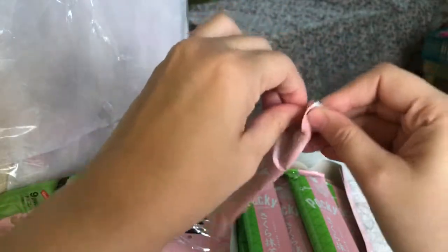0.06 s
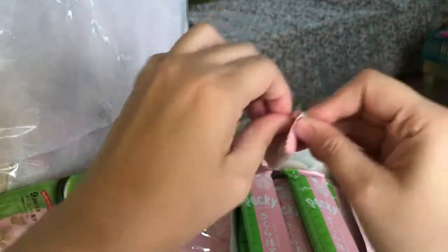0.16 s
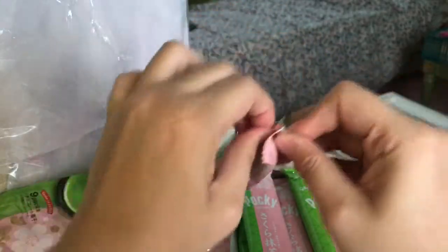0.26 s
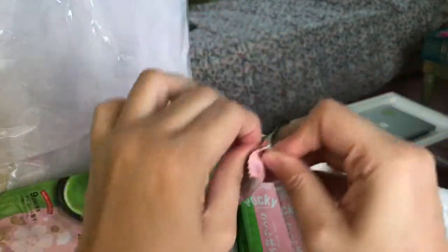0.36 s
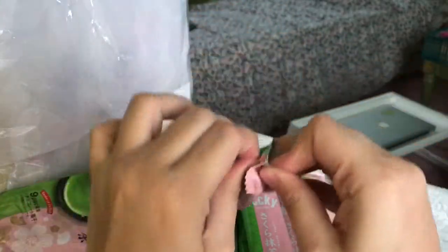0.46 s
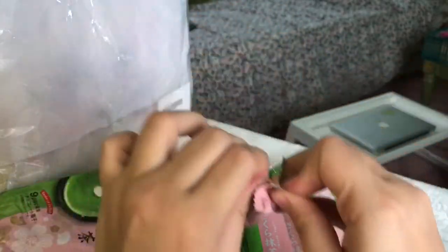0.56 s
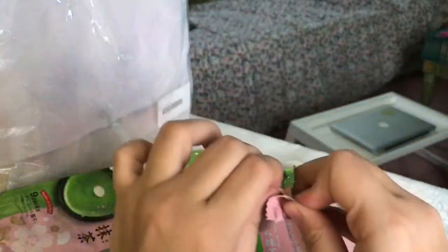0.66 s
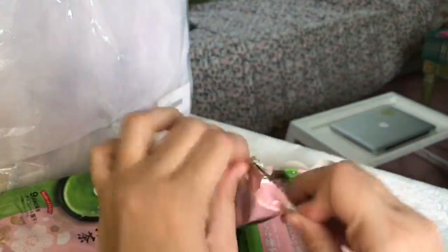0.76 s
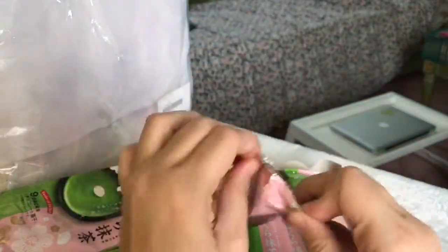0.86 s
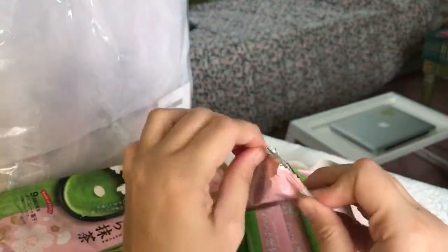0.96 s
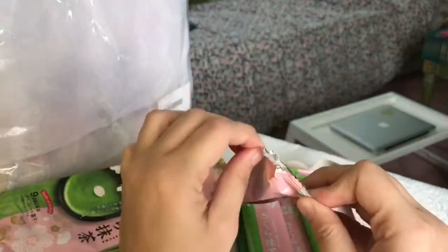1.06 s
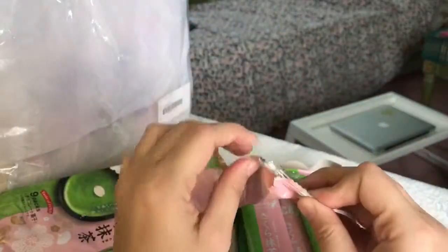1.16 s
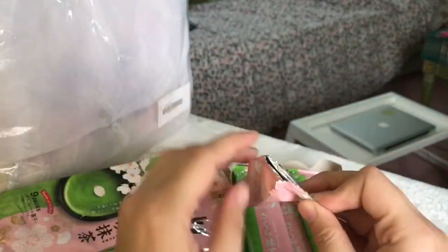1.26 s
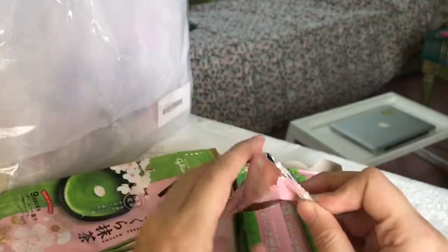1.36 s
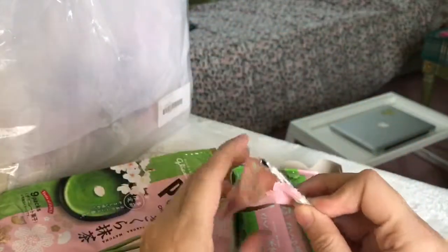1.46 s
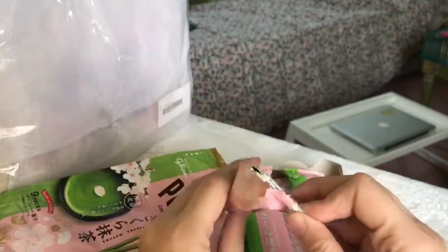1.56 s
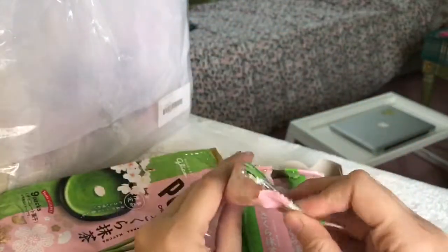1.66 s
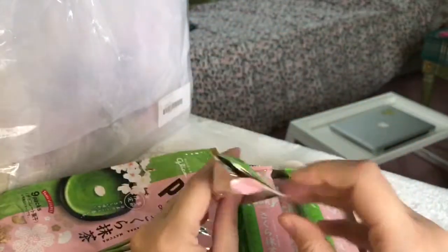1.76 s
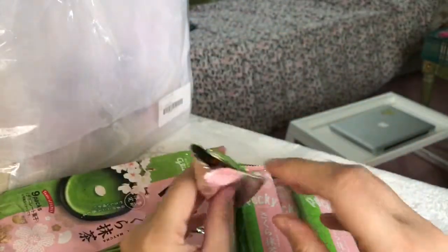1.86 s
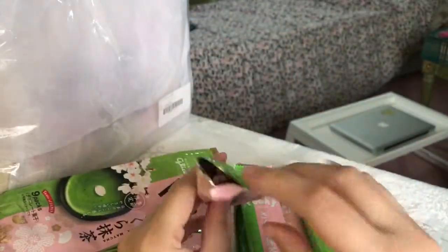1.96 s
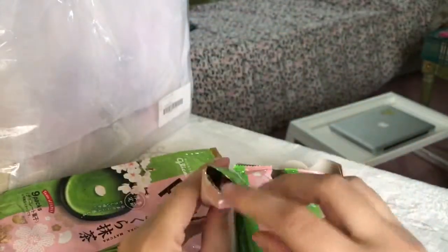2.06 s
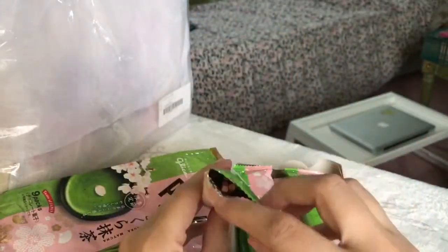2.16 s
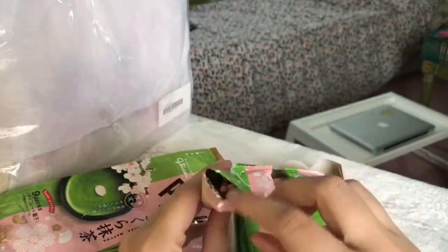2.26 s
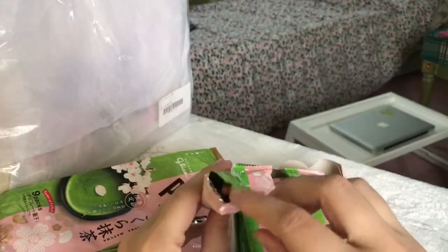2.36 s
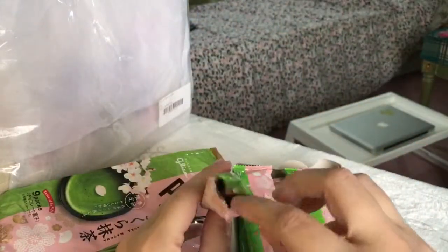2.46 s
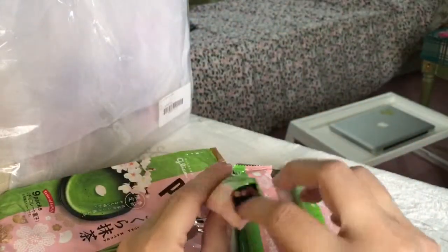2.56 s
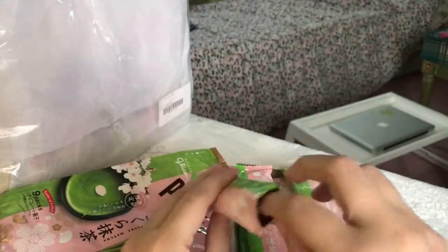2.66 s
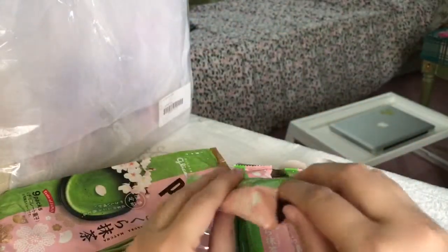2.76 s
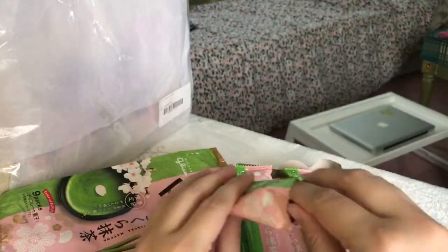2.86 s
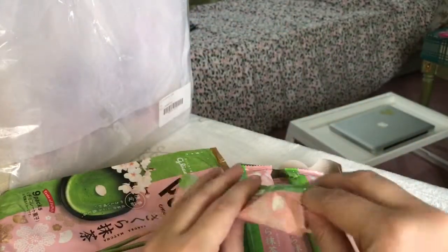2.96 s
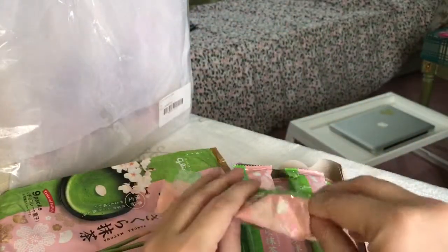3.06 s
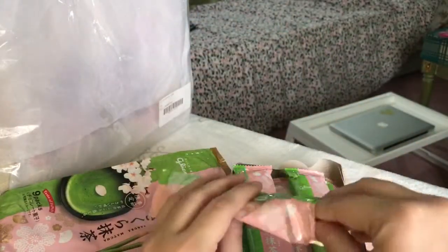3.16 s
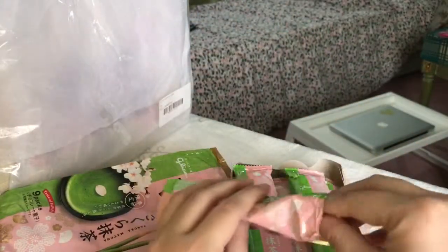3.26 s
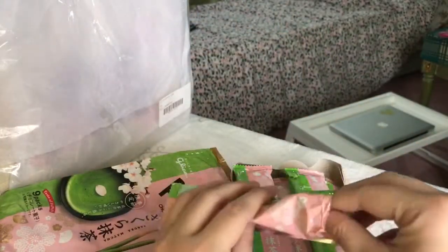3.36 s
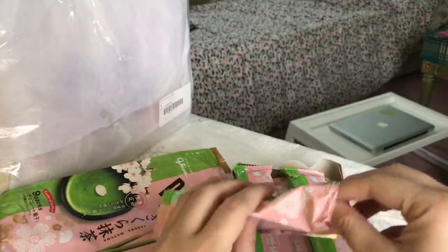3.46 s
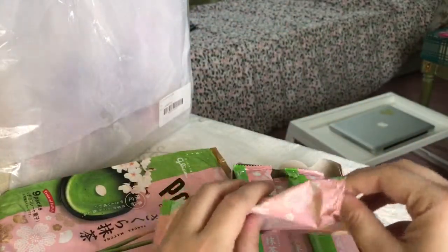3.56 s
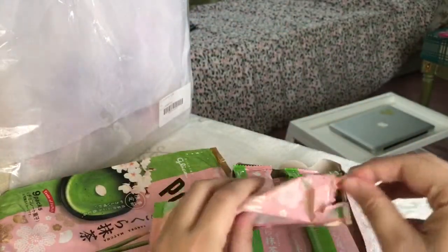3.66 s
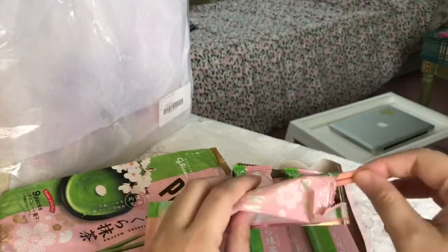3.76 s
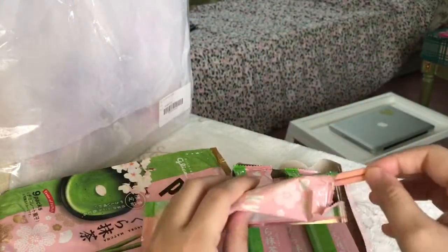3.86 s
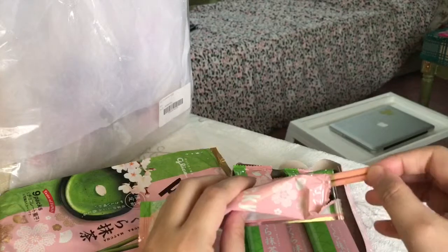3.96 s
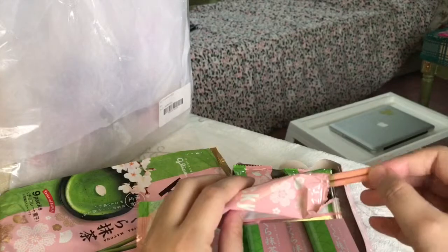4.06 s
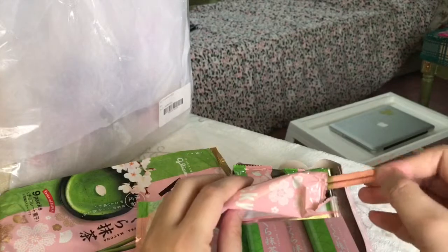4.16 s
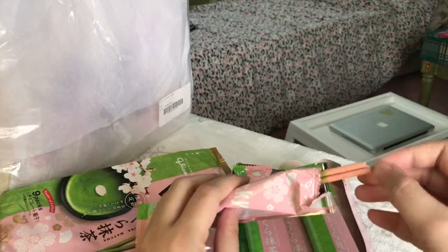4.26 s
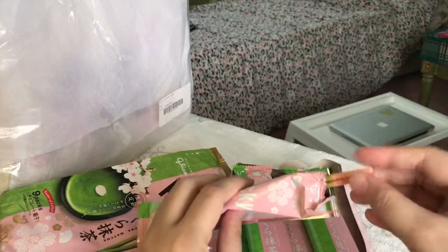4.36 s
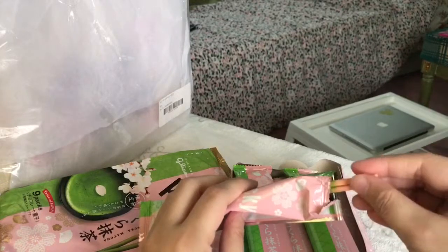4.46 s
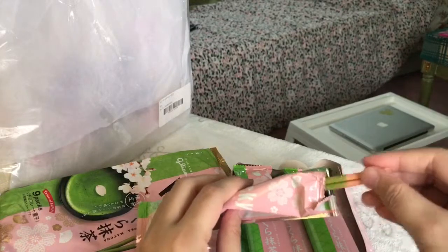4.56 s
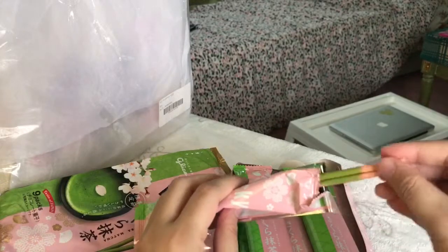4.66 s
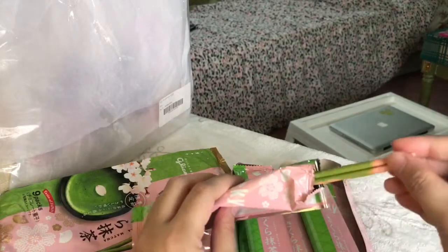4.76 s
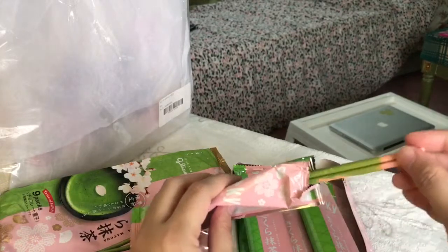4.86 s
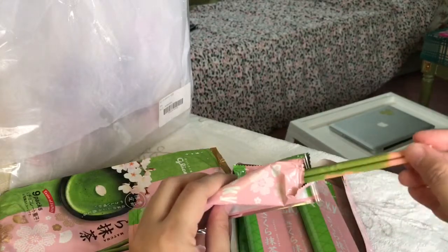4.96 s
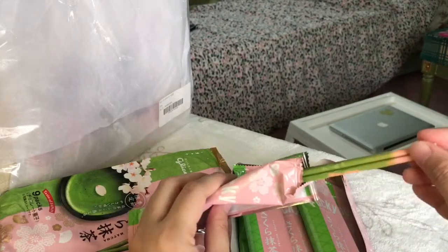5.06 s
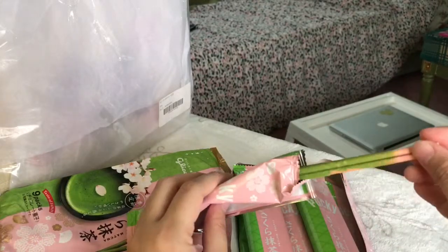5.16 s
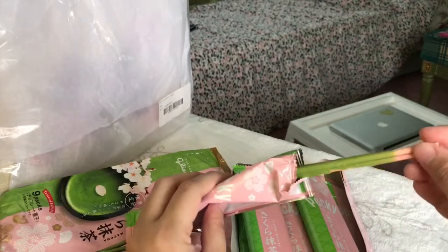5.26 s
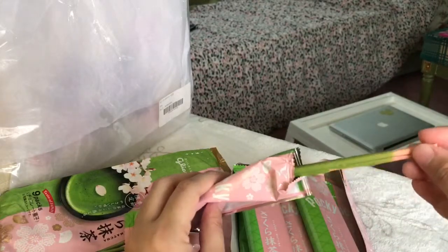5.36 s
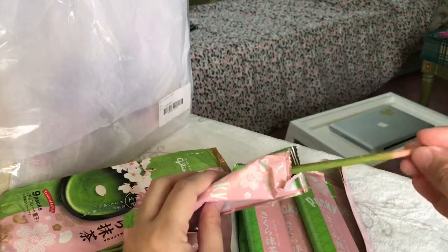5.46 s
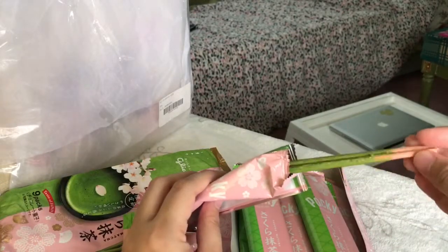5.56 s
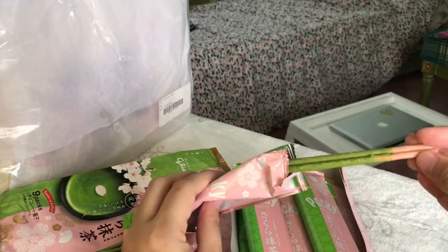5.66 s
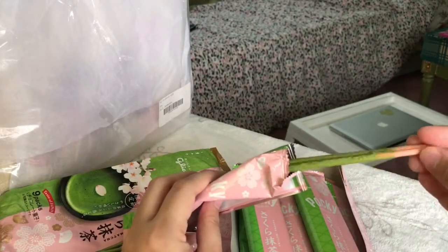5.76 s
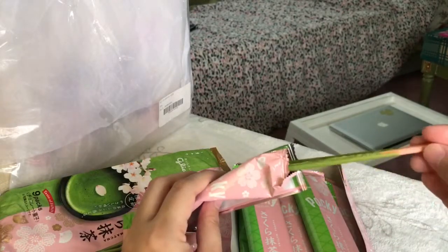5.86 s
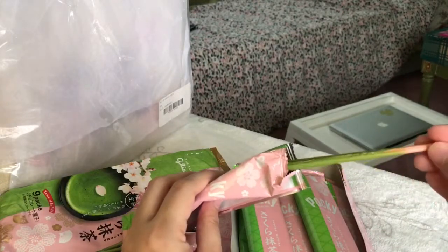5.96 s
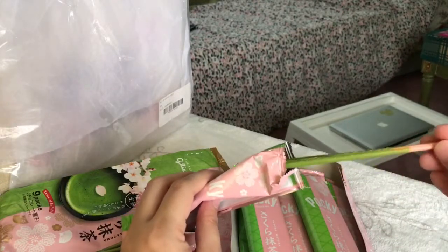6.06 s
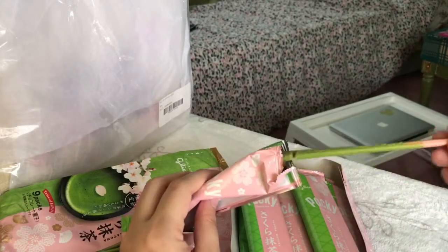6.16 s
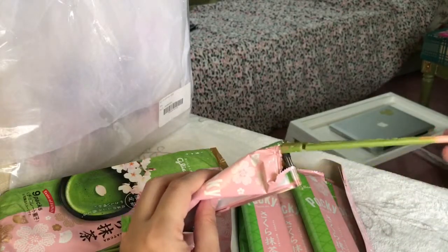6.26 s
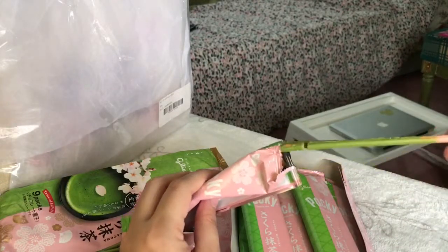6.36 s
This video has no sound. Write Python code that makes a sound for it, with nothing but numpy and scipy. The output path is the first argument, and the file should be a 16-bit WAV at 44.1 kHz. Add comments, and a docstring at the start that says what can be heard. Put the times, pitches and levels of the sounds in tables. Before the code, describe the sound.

Close to a phone microphone in a small furnished room, fingers pinch and tear a foil snack packet with bright snaps and a short harsh rip. Crinkling continues as the opening is spread and squeezed, then thins to soft slides and small ticks as biscuit sticks are drawn out. A low appliance hum runs throughout.

```python
"""A small furnished room, phone microphone close to a foil snack packet, an appliance motor humming throughout.
The seal tears in tiny jerks; creases snap as decaying noise flicks that ring at the pitch of their facets.
Fingers rustle the film as swelling crackle and hiss; rubbed panels sing as narrow noise at a sliding pitch.
Biscuit sticks slide out as softer rustle and tick as short decaying tones.
The room answers with a smeared near echo and a fading noise wash."""
import sys
import numpy as np
from scipy import signal
from scipy.fft import rfft, irfft, next_fast_len
from scipy.io import wavfile

SR = 44100
rng = np.random.default_rng(int(sys.argv[2]) if len(sys.argv) > 2 else 0)


def master_out(mix):
    """Clip the mix to full scale and print it as 16-bit PCM to the path in sys.argv[1]."""
    frames = np.transpose(np.atleast_2d(mix))
    ceiling = np.clip(frames, -1, 1)
    pcm = np.round(ceiling * 32767).astype(np.int16)
    wavfile.write(sys.argv[1], SR, pcm)


N = 283320
TIME = np.arange(N) / SR

# Motor hum: shaft_multiple, level_db (rms)
MOTOR_HARMONICS = [(1, -59), (5, -57), (6, -41.5), (7, -75), (8, -68.5), (13, -72.5)]
# Steady tones beside the motor hum: pitch_hz, level_db (rms)
STEADY_TONES = [(47.12, -61.5), (141.4, -69), (293.8, -61)]
# Spectrum of the appliance's air rush: frequency_hz, relative_level_db
AIR_SPECTRUM = [(20, -44), (36, -8), (46, -1.5), (66, -2), (108, -11.5), (140, 4.5), (160, -1), (183, -5.5),
                (255, -3), (295, -0.5), (325, -9), (650, -18), (2800, -33), (16000, -49.5)]
# Faint singing of the appliance casing: pitch_hz, width_hz, level_db (rms)
CASING_TONES = [(1670, 40, -91), (2577, 47, -77)]
MOTOR_HZ, IN_STEP_S = 48.41, .22  # shaft rate; moment when all the hum's tones are in step
AIR_DB = -51  # rms

# Ranges in which the film radiates, bass to top: low_hz, high_hz
FILM_RANGES = [(450, 2000), (2000, 7000), (7000, 11000), (11000, 16500)]
# Colour of the film within those ranges: frequency_hz, gain_db
FILM_COLOUR = [(400, -2.5), (900, 1.5), (2000, 0), (3500, 2.5), (5200, 2.5), (7400, -2), (9000, 2.5),
               (10400, -1.5), (12000, 7), (15500, 6)]
# Uneven colour of the film rubbed by biscuit sticks: frequency_hz, gain_db
BISCUIT_COLOUR = [(700, 0), (1500, -5.5), (2400, -0.5), (4200, -3), (6200, 2), (8000, -8), (10000, 5),
                  (12000, 1.5), (15500, 2)]

# In the film tables below, level_db is the direct level at 2-7 kHz, rms over length_s (SNAP_S for snaps);
# bass_db and treble_db tilt the ranges below and above it.
# Biscuit sticks knocking together: start_s, peak_level_db
STICK_KNOCKS = [(4.7206, -25), (5.4184, -33.5)]
# Taut film rubbed by skin or a stick: start_s, length_s, first_hz, last_hz, width_hz, level_db (rms)
PANEL_SCRAPES = [ (2.275, .115, 3170, 2720, 30, -66), (2.301, 0.011, 5860, 5900, 900, -60),
                 (2.324, 0.044, 5080, 4690, 896, -60.5), (4.14, 0.094, 4920, 5160, 1150, -68),
                 (4.764, 0.14, 1434, 1440, 151.2, -69), (5.125, 0.091, 2450, 2510, 700, -68),
                 (5.662, 0.096, 7600, 7200, 700, -78), (5.672, 0.13, 3950, 3650, 700, -71.5)]
# Sticks sliding inside the packet: start_s, length_s, level_db (before biscuit colour), treble_db
STICK_SLIDES = [(4.15, 0.1, -66.5, -8.5), (4.465, 0.11, -71.5, -5.5), (4.565, 0.14, -60.5, -3.5),
                (4.97, 0.13, -64.5, -6.5), (5.14, 0.028, -64.5, -8.5), (5.23, 0.11, -72.5, -7.5),
                (5.45, .19, -65.5, -6), (5.68, 0.348, -75.5, -4.5), (6.04, 0.15, -66, -6),
                (6.29, .07, -71, -4.5)]
# Fingers pinching, spreading or squeezing the film: start_s, length_s, level_db, treble_db
FINGER_GRIPS = [(0, 0.055, -45, 0), (0.165, .05, -56, 2), (0.366, 0.038, -55.5, 9),
                (0.489, 0.068, -62, 3.5), (0.559, 0.054, -45, 6), (0.64, .045, -51.5, 5.5),
                (0.785, .02, -45, 8), (0.803, 0.041, -35.5, -3), (0.858, 0.12, -55, -5.5),
                (1.0, .46, -65, -4.5), (1.166, 0.12, -66, -6), (1.629, 0.047, -55.5, -3.5),
                (1.682, 0.18, -58.5, -6), (1.856, 0.42, -66.5, -4.5), (2.327, 0.052, -56.5, -3),
                (2.551, 0.46, -61, -6), (2.694, 0.018, -57.5, 4), (2.932, 0.041, -48, -0.5),
                (2.978, 0.048, -43, -4.5), (3.044, 0.076, -53, -6), (3.117, 0.082, -48, -4.5),
                (3.184, 0.078, -54.5, -1), (3.349, 0.023, -51, -10.5), (3.39, 0.16, -59, -4.5),
                (3.522, 0.079, -52, -9.5), (3.635, 0.07, -45.5, -3.5), (3.801, 0.34, -67, -1.5)]
# Fingertip dragged over the ribs of the seal: start_s, length_s, level_db, bass_db, treble_db, unevenness (0-1)
SEAL_RIBS = [(3.2255, 0.025, -64, -14, 13, 0.1)]
# Film tearing, and a few single sharp clicks of film:
# start_s, length_s, level_db, bass_db, treble_db, unevenness (0-1)
FILM_RIPS_AND_CLICKS = [(0.085, 0.02, -44.5, -27, 5, 0.67), (0.1168, 0.021, -41.5, -22, 10, 0.9),
                        (0.1675, 0.036, -56, -13, 22, 0.82), (0.551, 0.0065, -37.5, -26, 23, 0.09),
                        (0.797, 0.0042, -25.5, -12, 7, 0.49), (0.8031, 0.019, -34.5, -15, 13.5, 0.89),
                        (0.8112, 0.014, -28, -28.5, 1, 0.76), (0.819, 0.0066, -32.5, 1, -8.5, 0.88),
                        (0.827, 0.01, -22, -10.5, 0.5, 0.6), (0.8406, 0.0052, -24, -19, -7, 0.8),
                        (1.795, 0.0062, -35.5, -4.5, -2, 0.54), (4.719, 0.0013, -33, -10, 0, 0.1)]
# Large creases buckling: start_s, facet_pitch_hz, level_db, treble_db
CREASE_SNAPS = [(0.0822, 4000, -24.5, -8), (0.1002, 4000, -28, -2), (0.1615, 8200, -28, -5.5),
                (0.1958, 12100, -35, 1.5), (0.2135, 12800, -35.5, 5.5), (0.275, 1500, -47.5, -20),
                (0.3247, 13600, -56.5, 15.5), (0.341, 8600, -45.5, 4), (0.3486, 4200, -38.5, 0.5),
                (0.3639, 1900, -45, 2), (0.3793, 4050, -41.5, -3), (0.4168, 9000, -55, 4),
                (0.438, 9000, -53, 9), (0.515, 10300, -50, 5.5), (0.5837, 9060, -32.5, -4.5),
                (0.6825, 5500, -43.5, 6), (0.6865, 1180, -35.5, -11), (0.6924, 11700, -47, 12),
                (0.7234, 6170, -34, 3), (0.7805, 8500, -50, 17), (0.883, 5300, -33.5, -2),
                (0.9028, 3400, -39.5, 4), (0.944, 8530, -23, -3.5), (0.9731, 8300, -38, 1.5),
                (0.9937, 3340, -36, -4), (1.02, 5430, -51, 11), (1.0407, 7400, -35.5, 0.5),
                (1.0787, 12600, -47.5, 4.5), (1.1087, 1000, -49.5, -11), (1.139, 1610, -47.5, -9),
                (1.221, 3240, -38, -4), (1.2354, 4500, -45, -13), (1.25, 3160, -37.5, -9),
                (1.286, 13700, -58.5, 15), (1.3309, 3140, -41.5, -17), (1.406, 3470, -37, -35),
                (1.4105, 3100, -39, -26), (1.4594, 1040, -47.5, -9), (1.4797, 2010, -49, -5.5),
                (1.6372, 3400, -51, -15), (1.6588, 4900, -37, -4), (1.7092, 1710, -41.5, -3),
                (1.763, 1300, -45, -3), (1.7807, 4850, -37, -4), (1.7999, 6540, -33, -3.5),
                (1.855, 3720, -39, 3), (1.892, 3380, -41.5, -9), (1.932, 3040, -38.5, -4),
                (1.9333, 2500, -35, -24), (1.957, 13000, -48, 6.5), (2.0361, 1500, -48, -4),
                (2.1972, 4040, -46.5, -9), (2.224, 5040, -53.5, 10), (2.2308, 5050, -38, -11),
                (2.249, 2000, -45.5, -5), (2.4873, 6400, -42.5, 0), (2.4909, 3460, -37.5, -4),
                (2.5585, 1834, -51, 6), (2.5751, 3550, -40, -7), (2.5887, 2460, -41, 1),
                (2.6072, 3070, -39, -5), (2.642, 1500, -47, -1), (2.6541, 2460, -41.5, -3),
                (2.726, 3100, -40.5, -3), (2.7487, 1040, -42, -19.5), (2.8003, 5380, -30.5, -0.5),
                (2.837, 3600, -35.5, 0), (2.8561, 6260, -29, 1), (2.893, 4380, -42.5, -3),
                (2.9809, 2580, -37, 0), (2.9962, 2340, -30.5, -4), (3.0214, 2000, -34, -4),
                (3.05, 2200, -38, -11), (3.068, 4430, -34.5, -3), (3.085, 2500, -37.5, -2),
                (3.1396, 2200, -27, -4), (3.143, 3540, -36.5, -5), (3.153, 1160, -33, 0.5),
                (3.1707, 2200, -38, -1), (3.222, 4820, -39, -5), (3.248, 1150, -39.5, -14),
                (3.256, 1840, -33.5, -22.5), (3.3123, 1470, -36.5, -4), (3.3372, 2920, -36, -11),
                (3.3626, 3100, -37, -7), (3.369, 2640, -22, -40), (3.385, 2220, -39.5, -25),
                (3.391, 3130, -46, -20), (3.4767, 3900, -44.5, -4), (3.496, 2500, -45, -2),
                (3.5371, 3560, -37, -2), (3.5553, 4220, -29, -2.5), (3.5671, 3910, -36, -13),
                (3.58, 9580, -34.5, 4), (3.589, 3200, -37.5, -2), (3.6171, 2300, -35.5, -2),
                (3.6396, 5900, -35, -7), (3.66, 11500, -46, 8), (3.6774, 2300, -34, -10),
                (3.6834, 2380, -34, -1), (3.7277, 3280, -33, -2), (3.7319, 2880, -28.5, -3),
                (3.8253, 3400, -33.5, -34), (3.885, 2500, -46, -11.5), (3.9223, 5250, -40.5, -5),
                (3.9685, 4600, -31.5, -2), (4.061, 1200, -52.5, -14), (4.106, 2360, -51, -23),
                (4.2343, 3550, -37.5, -4.5), (4.285, 3000, -48, -17), (4.5242, 3220, -40.5, -11.5),
                (4.673, 2750, -37.5, -33), (4.7212, 2950, -34.5, -5), (4.783, 2500, -49.5, -8),
                (5.045, 6000, -53, -4), (5.061, 6000, -55, -4), (5.4181, 4000, -36.5, -11.5),
                (5.4925, 2000, -48, -22), (5.5343, 2420, -47.5, -5), (5.847, 1200, -54.5, -15.5),
                (6.2963, 2010, -53, -14)]
# Span of facet pitches in the small snaps: lowest_hz, highest_hz
SMALL_RING_SPAN = (1800, 11000)

SNAP_S = .003  # level span of a snap, also the silent lead ahead of each snap, tear or click
# Larger facets ring lower and radiate more bass
FACET_HZ, FACET_BASS_DB, FACET_BASS_DB_PER_OCTAVE = 4000, -17, -9
# Taut film hisses high, slack film sounds fuller: bass falls as treble rises
STROKE_BASS_DB, STROKE_BASS_PER_TREBLE = -7.5, -1.12
# Small snaps during a grip: rate, level above the grip, scatter either way
SMALL_SNAPS_PER_S, SMALL_SNAP_DB, SMALL_SCATTER_DB = 30, 3.5, 5.5
# Forerunners of the large snaps: mean lead, level relative to the snap, share of snaps that have one
FORERUNNER_LEAD_S, FORERUNNER_DB, FORERUNNER_SHARE = 0.0036, -14, 0.32
TOP_HZ = 16100  # top of the phone's band

RANGE_FILTERS = [signal.butter(N=2, Wn=edges, btype="band", fs=SR, output="sos") for edges in FILM_RANGES]


def undb(db):
    """Decibels to gain."""
    return 10 ** (np.asarray(db) / 20)


def unit(x):
    """Scale to rms 1."""
    return x / np.sqrt(np.mean(x ** 2))


def colour(x, points):
    """Filter by a spectrum of (Hz, dB) points, joined along a logarithmic frequency axis."""
    hz, db = np.transpose(points)
    log_hz = np.log(np.fft.rfftfreq(len(x), 1 / SR) + 1)
    gain = undb(np.interp(log_hz, np.log(hz), db))
    return irfft(rfft(x) * gain, len(x))


def resonate(x, hz, width_hz):
    """One resonance, gain 1 at its centre."""
    return signal.lfilter(*signal.iirpeak(hz, hz / width_hz, fs=SR), x)


def add(track, s, sound):
    """Mix a sound in at time s."""
    start = int(np.clip(s * SR, 0, N - 1))
    track[start:start + len(sound)] += sound[:N - start]


def appliance():
    """Motor harmonics, the sixth far the strongest, with steady tones, rushing air and a singing casing."""
    lines = [(multiple * MOTOR_HZ, db) for multiple, db in MOTOR_HARMONICS] + list(STEADY_TONES)
    # close pairs drift in and out of step, so the hum throbs slowly
    hum = sum(np.sqrt(2) * undb(db) * np.sin(2 * np.pi * hz * (TIME - IN_STEP_S)) for hz, db in lines)
    air = undb(AIR_DB) * unit(colour(rng.standard_normal(N), AIR_SPECTRUM))
    casing = sum(undb(db) * unit(resonate(rng.standard_normal(N), hz, width_hz))
                 for hz, width_hz, db in CASING_TONES)
    return hum + air + casing


def room(x, wet_db=-17, t60_s=0.5, treble_t60_s=0.37, build_s=0.014, near_db=-21, near_s=0.0097, near_spread_s=0.006):
    """A smeared echo from nearby furniture, then the swelling and fading wash of the walls."""
    t = np.arange(SR) / SR
    wash_noise, near_noise = rng.standard_normal((2, SR))
    low = signal.sosfilt(signal.butter(2, 6000, fs=SR, output="sos"), wash_noise)
    # the treble of the wash dies sooner
    wash = low * undb(-60 * t / t60_s) + (wash_noise - low) * undb(-60 * t / treble_t60_s)
    wash = wash * np.minimum(t / build_s, 1)
    near = near_noise * np.exp(-((t - near_s) / near_spread_s) ** 2)
    response = (undb(wet_db) * unit(wash) + undb(near_db) * unit(near)) / np.sqrt(SR)
    return signal.fftconvolve(x, response)[:N]


def knocks(ring_hz=2150, decay_s=0.0003):
    """The soft coating cushions the contact; the stick bends and rings for only a few cycles."""
    out, t = np.zeros(N), TIME[TIME < 10 * decay_s]
    envelope = t / decay_s * np.exp(1 - t / decay_s)
    for s, db in STICK_KNOCKS:
        add(out, s, undb(db) * np.sin(2 * np.pi * ring_hz * t) * envelope)
    return out


def scrapes():
    """Friction feeds one resonance of a panel; its pitch slides as the tension changes."""
    out = np.zeros(N)
    for s, length_s, first_hz, last_hz, width_hz, db in PANEL_SCRAPES:
        n = int(length_s * SR)
        smooth = signal.butter(2, width_hz / 2, fs=SR, output="sos")
        noise = rng.standard_normal(SR) + 1j * rng.standard_normal(SR)
        friction = signal.sosfilt(smooth, noise)[-n:]
        phase = 2 * np.pi * np.cumsum(np.linspace(first_hz, last_hz, n)) / SR
        # noise around zero frequency, moved up to the sliding pitch
        singing = (friction * np.exp(1j * phase)).real
        add(out, s, undb(db) * unit(singing * np.sqrt(np.hanning(n))))
    return out


def film(x, length_s, db, bass_db, treble_db, lean=0.019, top_db=-4.0):
    """The film radiates a motion in four ranges; each level is an rms over length_s."""
    x, out = colour(x, FILM_COLOUR), 0
    # a dull motion keeps falling towards the top, a bright one keeps rising
    tilts_db = (bass_db, 0, (1 - lean) * treble_db + top_db, (1 + lean) * treble_db + top_db)
    for k, (sos, tilt_db) in enumerate(zip(RANGE_FILTERS, tilts_db)):
        band = signal.sosfilt(sos, x)
        to_unit_rms = np.sqrt(length_s * SR / np.sum(band ** 2))
        out = out + (-1) ** k * band * undb(db + tilt_db) * to_unit_rms
    return out


def flick(kick, decay_s, tremble_db, tremble_s, size=1024):
    """A sudden step of the film, then bending waves that scatter over its creases and die."""
    t = np.arange(size) / SR
    envelope = np.exp(-t / decay_s) + undb(tremble_db) * np.exp(-t / tremble_s)
    x = rng.standard_normal(size) * envelope
    x[0] += kick
    return x


def crackle(per_s=450, spread_db=5.5, ring_db=7, ring_q=5, clump_db=4.0, clump_s=.014, count=12):
    """Countless tiny creases tick on facets of many sizes."""
    out = 0
    for hz in np.geomspace(2000, 14000, count):
        struck = rng.random(N) < per_s / count / SR
        sizes = undb(spread_db * np.minimum(rng.exponential(size=N), 3.2))
        tick = flick(kick=3.5, decay_s=0.00069, tremble_db=-21, tremble_s=0.0091)
        tick = unit(tick + undb(ring_db) * resonate(tick, hz, hz / ring_q))
        out = out + signal.oaconvolve(struck * sizes, tick)[:N]
    # the level wanders, so louder and softer clumps of ticks are heard
    clumps = np.interp(TIME / clump_s, np.arange(N), rng.standard_normal(N))
    return unit(out * undb(clump_db * clumps))


def rustle(strokes, crackle_share, attack_share, release_s):
    """Each stroke swells, holds and dies away: crackle over the hiss of film rubbing on skin or biscuit."""
    hiss = rng.standard_normal(N)
    motion = np.sqrt(crackle_share) * crackle() + np.sqrt(1 - crackle_share) * hiss
    out = np.zeros(N)
    for s, length_s, db, treble_db in strokes:
        t = TIME[:next_fast_len(int((length_s + 10 * release_s) * SR))]
        swell = np.minimum(t / (attack_share * length_s), 1)
        release = np.exp(-np.maximum(t - length_s, 0) / release_s)
        stroke = swell * release * np.roll(motion, -int(s * SR))[:len(t)]
        bass_db = STROKE_BASS_DB + STROKE_BASS_PER_TREBLE * treble_db
        add(out, s, film(stroke, length_s, db, bass_db, treble_db))
    return out


def jerks(table, jerk_hz, scatter_db=5.0, size=4096):
    """Film gives way in tiny jerks, whose timing and strength scatter with the unevenness."""
    out = np.zeros(N)
    for s, length_s, db, bass_db, treble_db, uneven in table:
        x, t = np.zeros(size), 0
        for wait, strength in rng.standard_normal((64, 2)):  # at most 64 jerks
            if t >= length_s:
                break
            jerk = flick(kick=8, decay_s=.00045, tremble_db=-17, tremble_s=.0014)
            add(x, SNAP_S + t, jerk * undb(scatter_db * uneven * strength))
            t += np.exp(0.62 * uneven * wait) / jerk_hz
        add(out, s - SNAP_S, film(x, length_s, db, bass_db, treble_db))
    return out


def small_snaps(count=16):
    """Small creases give way at random moments while the fingers grip; rows as in CREASE_SNAPS."""
    rows = []
    lowest_hz, highest_hz = SMALL_RING_SPAN
    for s, length_s, db, treble_db in FINGER_GRIPS:
        for k, (when, facet, force) in enumerate(rng.random((count, 3))):
            after_s = (k + when) / SMALL_SNAPS_PER_S
            hz = lowest_hz * (highest_hz / lowest_hz) ** facet
            snap_db = db + SMALL_SNAP_DB + SMALL_SCATTER_DB * (2 * force - 1)
            if after_s < length_s:
                rows.append((s + after_s, hz, snap_db, treble_db))
    return rows


def forerunners():
    """Some creases give a little a few milliseconds before they buckle; rows as in CREASE_SNAPS."""
    rows = []
    for s, hz, db, treble_db in CREASE_SNAPS:
        when, luck = rng.random(2)
        if luck < FORERUNNER_SHARE:
            rows.append((s - FORERUNNER_LEAD_S * (.5 + when), hz, db + FORERUNNER_DB, treble_db))
    return rows


def snaps(ring_db=8, ring_q=4, side_db=2, side_q=16, flat_kick=14):
    """Each buckling crease flicks a facet, which rings briefly at its own pitch and sets its neighbours off.
    Returns the sound towards the phone, and the sound summed over all directions, where the facets even out."""
    direct, all_round, lead = np.zeros(N), np.zeros(N), np.zeros(int(SNAP_S * SR))
    for s, hz, db, treble_db in list(CREASE_SNAPS) + forerunners() + small_snaps():
        bass_db = FACET_BASS_DB + FACET_BASS_DB_PER_OCTAVE * np.log2(hz / FACET_HZ)
        x = np.r_[lead, flick(kick=2.5, decay_s=.0008, tremble_db=-24, tremble_s=.004)]
        neighbours = sum(resonate(x, f, f / side_q) for f in rng.uniform(1200, 12000, size=5))
        rung = x + undb(ring_db) * resonate(x, hz, hz / ring_q) + undb(side_db) * neighbours
        add(direct, s - SNAP_S, film(rung, SNAP_S, db, bass_db, treble_db))
        # a stronger click in place of the rings flattens the spectrum
        plain = x + flat_kick * signal.unit_impulse(len(x), len(lead))
        add(all_round, s - SNAP_S, film(plain, SNAP_S, db, bass_db, treble_db))
    return direct, all_round


def scene():
    """The packet close by and its echoes from the room, over the appliance hum."""
    hum = appliance()
    sliding = rustle(STICK_SLIDES, crackle_share=0.53, attack_share=0.33, release_s=0.019)
    gripping = rustle(FINGER_GRIPS, crackle_share=0.78, attack_share=0.097, release_s=0.013)
    ripping = jerks(FILM_RIPS_AND_CLICKS, jerk_hz=1389) + jerks(SEAL_RIBS, jerk_hz=242)
    handling = ripping + gripping + colour(sliding, BISCUIT_COLOUR) + scrapes() + knocks()
    direct, all_round = snaps()
    echoes = room(handling + all_round)
    return (direct + handling + echoes + hum)[None]


def record(dry):
    """The phone cuts the top steeply."""
    return signal.sosfilt(signal.ellip(8, .2, 85, TOP_HZ, fs=SR, output="sos"), dry)


dry = scene()
out = record(dry)
master_out(out)
```